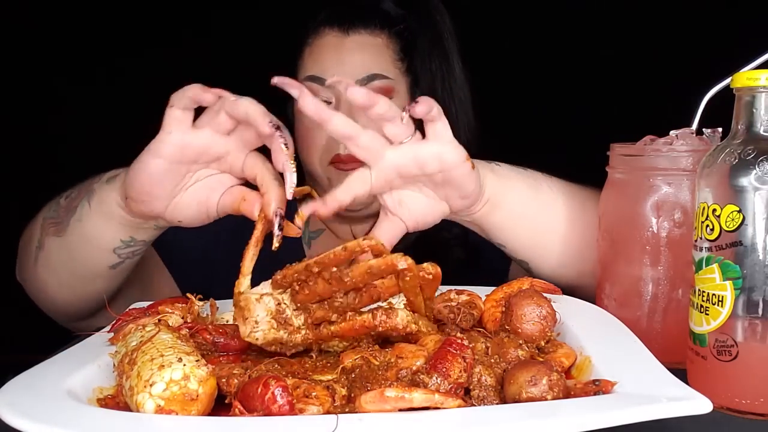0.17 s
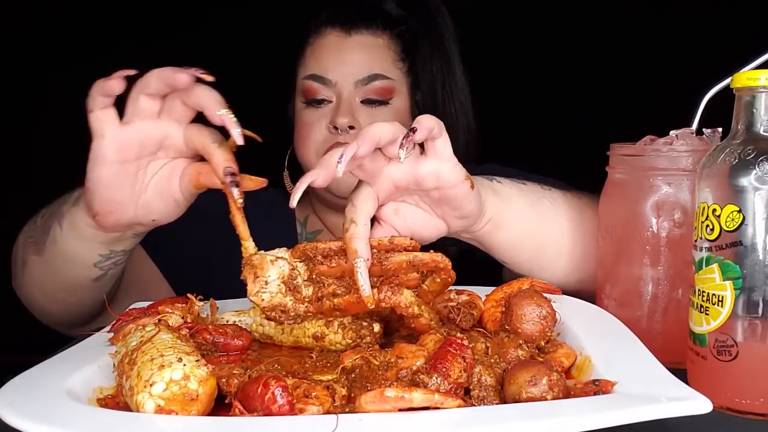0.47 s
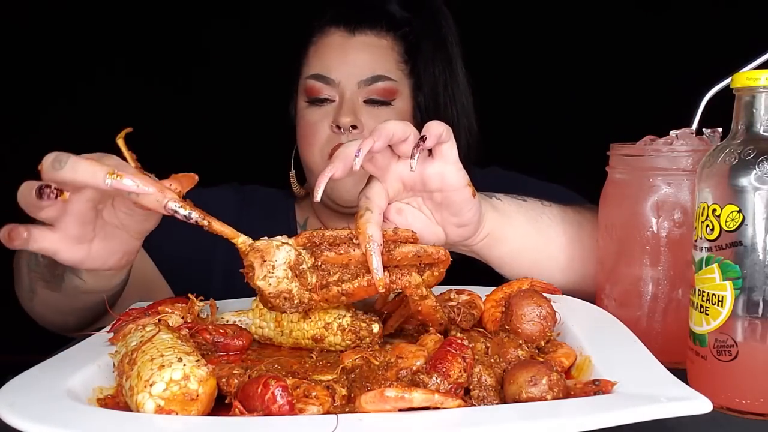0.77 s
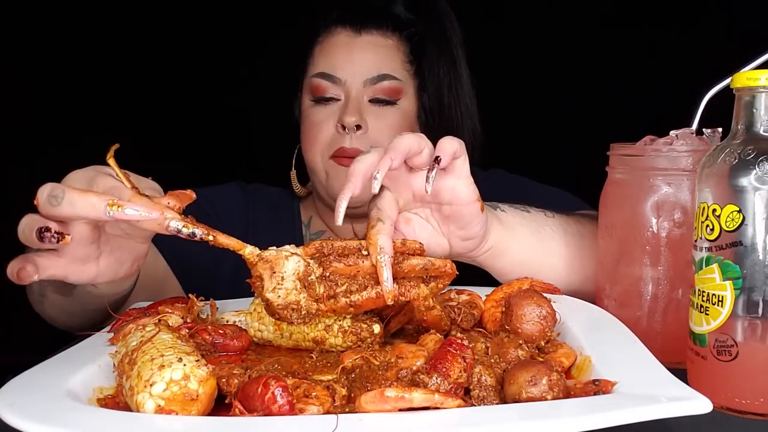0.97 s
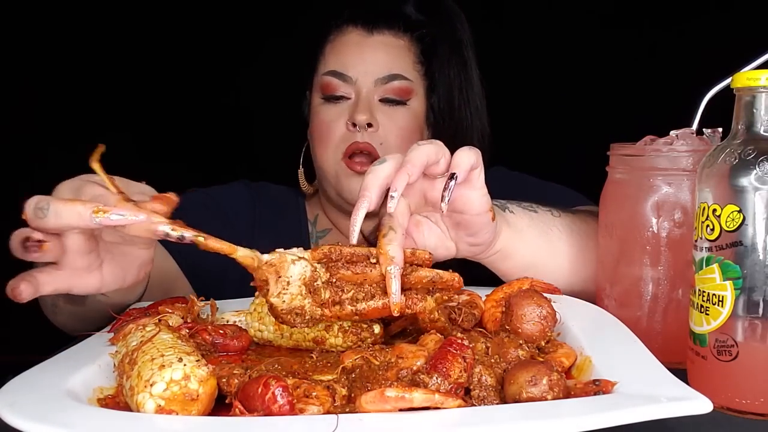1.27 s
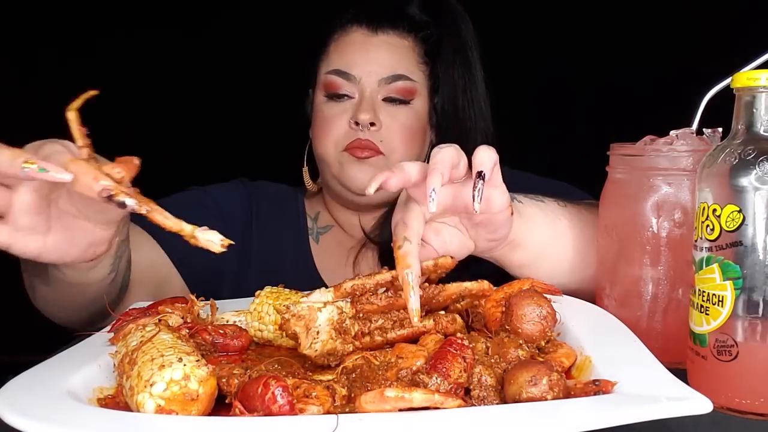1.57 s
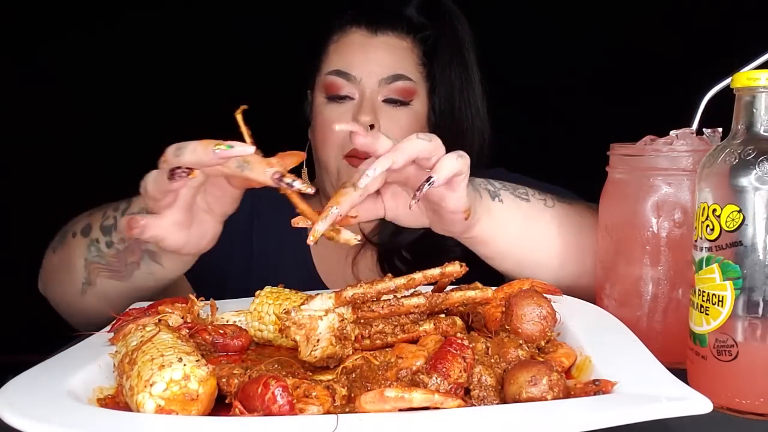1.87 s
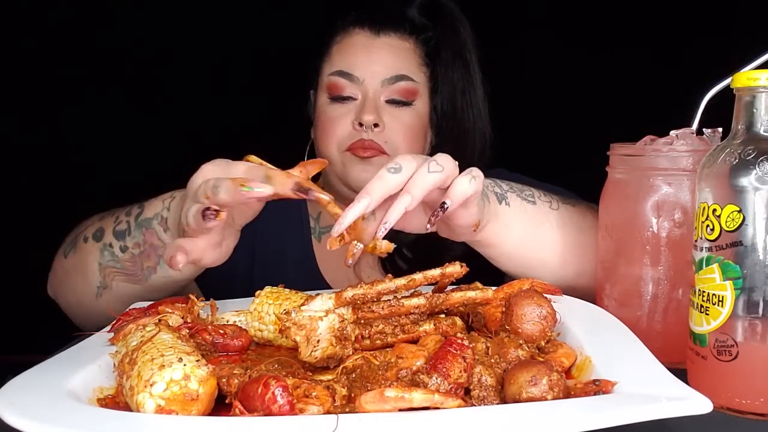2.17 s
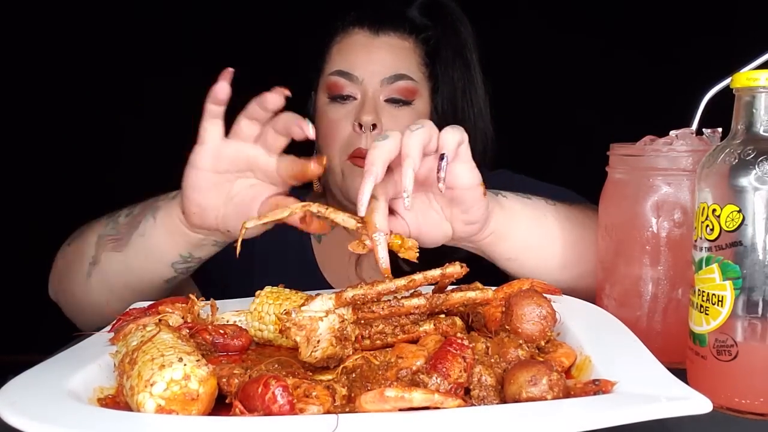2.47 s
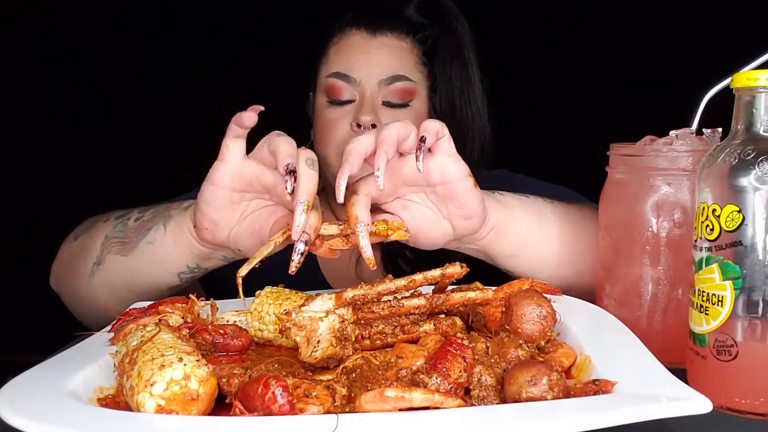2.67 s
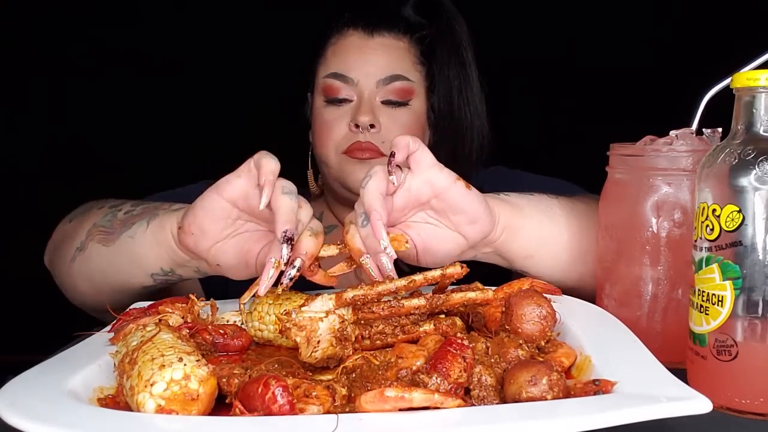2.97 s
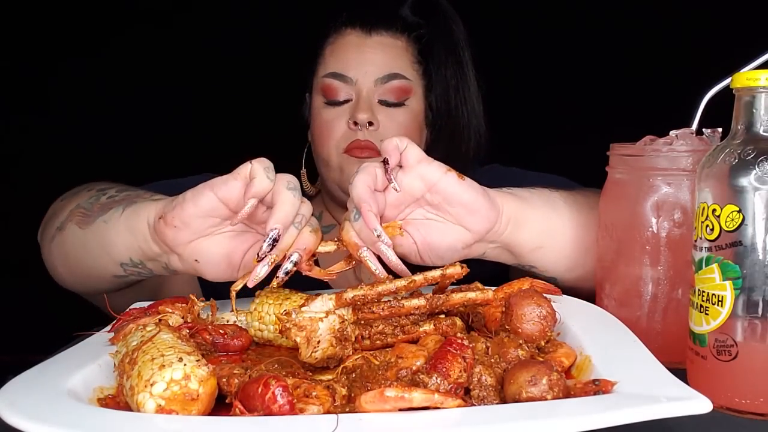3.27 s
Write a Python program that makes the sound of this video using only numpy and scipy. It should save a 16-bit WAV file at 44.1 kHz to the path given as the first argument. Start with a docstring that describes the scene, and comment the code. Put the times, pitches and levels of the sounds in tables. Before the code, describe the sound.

Sharp crab shell cracking with small ticks and squishes, close in a small humming room

```python
"""Fracture of a crab leg

A cooked crab leg is twisted off its cluster by hand, close to the right microphone in a small room.
Shell ticks and snaps are filtered noise bursts with short damped modes; hollow pieces knock as one mode.
Tearing fibres and squishing sauce are runs of tiny damped sinusoids. Decaying noise tails form the room.
An electric appliance hums as unsteady tones, with a rush of air and microphone hiss as coloured noise."""
import sys
import numpy as np
from scipy import signal
from scipy.fft import rfft, irfft, next_fast_len
from scipy.io import wavfile
from scipy.ndimage import uniform_filter1d, map_coordinates

SR = 44100
rng = np.random.default_rng(int(sys.argv[2]) if len(sys.argv) > 2 else 0)


def bounce(signal):
    """Save signal as a 16-bit WAV file at the path given by the first command-line argument."""
    frames = np.transpose(np.atleast_2d(signal))
    limited = np.clip(frames, -1, 1)
    pcm = np.round(limited * 32767).astype(np.int16)
    wavfile.write(sys.argv[1], SR, pcm)


N = 149940
TOP_HZ = 16000  # centre of the upper band edge
T = np.arange(SR // 25) / SR  # time within one small event, s

# Microphone hiss, relative spectrum: [f/Hz, level/dB]
HISS_SPECTRUM = [(1000, -1), (7000, -21), (9000, -11.5), (12000, -5), (15000, -3)]
# Additional hiss band of the right microphone, relative spectrum: [f/Hz, level/dB]
RIGHT_HISS_SPECTRUM = [(500, 11.5), (3500, -3), (5000, 0.5), (6200, -3), (7300, 5), (7800, -5), (8200, -54),
                       (10000, -45)]
HISS_DB, RIGHT_HISS_DB = -72, -61.5  # rms

# Rush of air from the appliance, relative spectrum: [f/Hz, level/dB]
AIR_SPECTRUM = [(20, -46), (45, -1), (80, -5.5), (140, -8), (180, -3), (215, 0.5), (250, -1), (280, -4.5),
                (380, -5), (460, -13), (520, -10.5), (640, -13.5), (760, -7.5), (860, -14), (1200, -23),
                (1800, -24.5), (2400, -29.5), (3500, -37), (7000, -50), (16000, -54)]
# Rms of the rush before its swell: [left level/dB, right level/dB]
AIR_DB = [-51.5, -48]
# Swell of the rush: [t/s, level/dB]
AIR_SWELL = [(0, 3.5), (.4, 2), (1.2, 0.8), (1.8, 0), (3.4, 0.2)]
# Left-right correlation of the rush: [f/Hz, correlation/1]
AIR_CORRELATION = [(60, 1), (150, 0.99), (300, 0.97), (600, 0.22), (1200, 0.04), (4000, 0.051)]
# Motor tones, rms before unsteadiness:
# [f/Hz, left level/dB, right level/dB, left phase lead/rad, unsteadiness/1]
HUM_TONES = [(58.75, -45.5, -46.5, -0.45, 0.1), (106.7, -42, -41, -0.091, 0.06),
             (174.9, -57, -56, 0.37, 0.13), (214.3, -64, -65.5, 0.52, 1), (291.1, -57, -53.5, 0.94, 0.23),
             (588.4, -59, -57, 0.73, 0.02), (794, -83.5, -65, 0.97, 0.1), (1646, -84, -72, -0.14, 0.27),
             (3004, -87, -84, 0.97, 0.2)]

# Late reverberation: [f/Hz, t60/s]
ROOM_T60 = [(300, 0.12), (2000, 0.18), (6000, 0.16), (15000, 0.12)]
# Room response at the left microphone: [f/Hz, level/dB]
ROOM_LEFT = [(1000, -6.5), (4000, -12), (7000, -20), (9000, -8), (15000, -13)]
# Room response at the right microphone: [f/Hz, level/dB]
ROOM_RIGHT = [(1000, -9), (3000, -8), (7000, -8), (9000, -9.5), (15000, -3)]
ROOM_GAP_S, EARLY_DB, EARLY_T60_S = 0.004, -9, 0.16  # early level is relative to the late tail

# Shading of the crab at the left microphone: [f/Hz, level/dB]
LEFT_SHADING = [(1000, -17.5), (2500, -20), (4000, -12), (5500, -22), (7300, -18), (9000, -12),
                (12000, -14.5), (15000, -23)]
LEFT_LAG_S, SCATTER_DB, SCATTER_T60_S = 0.00016, 6, .013

# Sauce squishes, rms over each run: [start t/s, length/s, level/dB, central f/Hz]
SQUISHES = [(.845, 0.035, -53, 2480), (1.288, .045, -50, 2470), (1.625, 0.053, -60, 2620),
            (2.15, 0.016, -63, 2500), (2.375, 0.045, -63.5, 2020)]
# Fibres tear and wet meat shifts, rms over each run: [start t/s, length/s, level/dB, central f/Hz]
TEARS = [(0, 0.029, -61, 6400), (.06, 0.046, -60.5, 7300), (.145, 0.051, -59, 8100),
         (.68, 0.076, -65, 10000), (.843, 0.039, -48.5, 6600), (.95, 0.27, -67.5, 9150),
         (1.292, 0.048, -42.5, 7000), (1.46, 0.11, -69.5, 10200), (1.755, 0.04, -54, 9900),
         (1.8, 0.044, -60, 9900), (2.15, 0.11, -84, 11700), (2.365, 0.059, -59.5, 9200),
         (2.7, .08, -76, 11900), (2.92, 0.53, -75, 12500), (3.255, 0.014, -62, 13000)]
# Hollow pieces of leg knock together: [t/s, level/dB, f/Hz, t60/s]
KNOCKS = [(0.1548, -44.5, 5710, .035), (0.851, -46, 2940, .015), (0.8673, -38, 2180, .012),
          (1.641, -53, 3300, .025), (1.758, -36.5, 3950, 0.031), (1.783, -36, 2230, .011),
          (1.814, -35.5, 1890, 0.014), (2.369, -53.5, 4550, 0.053)]
KNOCK_RISE_S, KNOCK_ROOM_DB = 0.00032, 3.5  # knocks reach the room more than the snaps do
KNOCK_ROUGH = .07  # random phase step, rad per sample

# Spectral envelope of a crack, before tilt: [f/Hz, level/dB]
SHELL_SPECTRUM = [(200, -31), (700, -27), (1300, -10), (1900, -9.5), (2700, 0.5), (4000, -0.5), (5500, 3.5),
                  (7500, 3.5), (9000, -4.5), (12000, 3.5), (15000, 2.5)]
CRACK_RISE_S = 0.00006
CRACK_RAGGED_DB, SPLINTER_RATE = 4, 3500  # spread in splinter strength; splinters per second
SECOND_MODE_DB = -3.5  # relative to the main mode
RING_RISE_S, RING_ROUGH = .0003, .09  # the wet piece drifts by a random phase step, rad per sample

# Small ticks of shell and fingernails: [t/s, crack level/dB, mode f/Hz]
TICKS = [(0.065, -40, 6300), (0.147, -33.5, 12700), (0.391, -26, 11100), (0.414, -32, 6900),
         (0.4775, -37, 5500), (0.6891, -34.5, 12500), (0.718, -37, 7240), (0.7784, -31, 13700),
         (.808, -38, 14000), (0.832, -27, 13000), (.847, -31, 13500), (0.9237, -30.5, 12600),
         (1.0535, -40, 6840), (1.176, -32, 13500), (1.227, -36, 13900), (1.4312, -36, 12600),
         (1.7507, -34, 8000), (1.782, -35, 10700), (2.1535, -55, 3300), (2.369, -39, 6400),
         (2.389, -41, 12100), (3.194, -45, 13900), (3.3185, -38.5, 14200)]
TICK_T60_S, TICK_TILT_DB = 0.0022, 1  # tilt per octave
TICK_RING_DB, TICK_RING_T60_S = -2.5, .0014  # ring setting relative to the crack's
# The shell gives way: [t/s, crack level/dB, tilt/(dB per octave), crack t60/s,
# main mode f/Hz, second mode f/Hz, main mode level/dB re amplitude 2]
SNAPS = [(0.3778, -28.5, -2, 0.01, 7160, 4940, -23.5), (0.6198, -30, -1, 0.01, 7120, 7500, -27.5),
         (0.8187, -33, 3, 0.0085, 13300, 7500, -45), (0.839, -32, -2, 0.004, 7100, 5160, -31),
         (0.8423, -29, -3, 0.0033, 9800, 7000, -26), (0.8497, -28.5, -1, 0.013, 7500, 6740, -22),
         (.8602, -35, -3, 0.005, 7000, 10800, -25.5), (.8675, -32, -4, 0.0045, 14800, 3000, -35),
         (1.2508, -23, 9, 0.0089, 6660, 3200, -34.5), (1.2526, -16, 14, 0.009, 12960, 11250, -11),
         (1.262, -33, 5, 0.006, 11500, 6900, -29), (1.272, -40, -7, 0.0081, 13500, 6800, -35),
         (1.287, -25, -4, .004, 13400, 15000, -26.5), (1.2895, -8, 3, 0.0051, 6070, 4830, -17),
         (1.2904, -14, 0, 0.0043, 6360, 2970, -21), (1.293, -18, -0.5, 0.012, 5340, 2500, -24),
         (1.2985, -4, 10, .0035, 14500, 12800, -19), (1.3038, -17, -4, 0.0035, 5760, 2850, -17),
         (1.3094, -8.5, 4.5, 0.0058, 14200, 2800, -19), (1.3179, -16.5, 0, 0.016, 5010, 5100, -16.5),
         (1.3202, -12.5, 0.5, 0.005, 12000, 3240, -29), (1.3263, -31, 3, .004, 7000, 3040, -24),
         (1.333, -25.5, -4, 0.006, 6500, 2730, -29), (1.336, -22, 3, 0.0047, 5070, 3500, -28),
         (1.3796, -15, -8.5, 0.0024, 2190, 1280, -25.5), (1.758, -37, 5, 0.0098, 4330, 7000, -30.5),
         (2.702, -43.5, -1, 0.0054, 8450, 7360, -52), (3.2533, -33.5, 8, 0.0085, 6800, 14400, -40)]
SNAP_RING_T60_S = .004


def amp(db):
    """A level in decibels corresponds to an amplitude ratio of 10^(dB/20)."""
    return 10 ** (np.asarray(db) / 20)


def unit(x):
    """Division by the root mean square gives a signal of rms 1."""
    return x / np.sqrt(np.mean(x ** 2) + 1e-20)


def along(points, hz):
    """A curve of (f/Hz, value) points is interpolated on a logarithmic frequency axis."""
    f, value = np.transpose(points)
    return np.interp(np.log(hz + 1), np.log(f + 1), value)


def add(track, s, sound):
    """Superposition: a sound starting at time s sums into the track in place."""
    start = max(round(s * SR), 0)
    part = track[..., start:][..., :sound.shape[-1]]
    part += sound[..., :part.shape[-1]]


def wobble(rate):
    """Random knots, rate per second, joined by a spline give a slow smooth fluctuation."""
    knots = rng.standard_normal(int(N * rate / SR) + 4)
    return map_coordinates(knots, [np.arange(N) * rate / SR])


def filtered(x, response):
    """A linear filter multiplies the spectrum by a response of frequency."""
    m = next_fast_len(N + SR // 2)
    hz = np.fft.rfftfreq(m, 1 / SR)
    return irfft(rfft(x, m) * response(hz), m)[..., :N]


def noise(spectrum):
    """White noise shaped by a spectrum becomes coloured noise of rms 1."""
    white = rng.standard_normal(N)
    return unit(filtered(white, lambda hz: amp(along(spectrum, hz))))


def hiss():
    """Microphone self-noise is independent per channel; the right has a louder band of its own."""
    left, right = amp(HISS_DB) * np.array([noise(HISS_SPECTRUM), noise(HISS_SPECTRUM)])
    return np.array([left, right + amp(RIGHT_HISS_DB) * noise(RIGHT_HISS_SPECTRUM)])


def air_rush():
    """Partial coherence: two independent noises in sum and difference set the left-right correlation."""
    def angle(hz):
        return np.arccos(np.clip(along(AIR_CORRELATION, hz), -1, 1)) / 2

    def shares(hz):
        return np.array([np.cos(angle(hz)), np.sin(angle(hz))])

    mid, side = filtered(np.array([noise(AIR_SPECTRUM), noise(AIR_SPECTRUM)]), shares)
    swell = amp(np.interp(np.arange(N) / SR, *np.transpose(AIR_SWELL)))
    return swell * amp(AIR_DB)[:, None] * np.array([mid + side, mid - side])


def motor_hum():
    """Tones as rotating phasors, with slow random changes of amplitude and phase, differ between ears."""
    t, hum = np.arange(N) / SR, np.zeros((2, N))
    for hz, left_db, right_db, lead, unsteady in HUM_TONES:
        carrier = np.exp(2j * np.pi * (hz * t + rng.random()))
        tone = carrier * (1 + unsteady * (wobble(7.04) + 1j * wobble(5.75)))
        left = amp(left_db) * tone * np.exp(1j * lead)
        right = amp(right_db) * tone
        hum += np.sqrt(2) * np.real([left, right])  # peak from rms
    return hum


def room(x):
    """Diffuse reverberation: after a short gap, each 40 ms of sound is convolved with a new noise tail."""
    wet, step = np.zeros((2, N)), SR // 25
    for i in range(0, N, step):
        hz, t, grid = signal.stft(rng.standard_normal((2, SR // 2)), SR, nperseg=256)
        late = amp(-60 * t / along(ROOM_T60, hz)[:, None])
        early = amp(EARLY_DB - 60 * t / EARLY_T60_S)
        tail = signal.istft(grid * (late + early), SR, nperseg=256)[1]
        tail /= np.linalg.norm(tail[0])
        add(wet, i / SR + ROOM_GAP_S, signal.fftconvolve(x[None, i:i + step], tail, axes=1))
    return filtered(wet, lambda hz: amp([along(ROOM_LEFT, hz), along(ROOM_RIGHT, hz)]))


def far_side(near):
    """Propagation to the left microphone delays and shades the crab; hands and plate scatter it."""
    blur, step = np.zeros(N), SR // 50
    for i in range(0, N, step):
        echo = rng.standard_normal(len(T)) * amp(-60 * T / SCATTER_T60_S)
        echo /= np.linalg.norm(echo)
        add(blur, i / SR, signal.fftconvolve(near[i:i + step], echo))

    def path(hz):
        return amp(along(LEFT_SHADING, hz)) * np.exp(-2j * np.pi * hz * LEFT_LAG_S)

    return filtered(near + amp(SCATTER_DB) * blur, path)


def grains(runs, count, spread, cycles, size_db, glide):
    """Many damped sinusoids, densest mid-run and scattered in pitch and size, fuse into a texture."""
    track = np.zeros(N)
    for s, length, db, hz in runs:
        place, size, pitch = rng.random((3, count))
        pitch = hz * np.exp(spread * (2 * pitch - 1))
        life = T * pitch[:, None] / cycles  # reaches 1 when a pop has decayed by 60 dB
        phase = 2 * np.pi * pitch[:, None] * T * (1 + glide * np.minimum(life, 1))
        pops = np.sin(phase) * amp(-60 * life)
        strength = amp(-size_db * np.log(np.maximum(size, .02)))  # few large, many small
        pops *= (strength * (pitch < TOP_HZ))[:, None]
        starts = (np.arccos(1 - 2 * place) / np.pi * length * SR).astype(int)
        samples = starts[:, None] + np.arange(len(T))
        run = np.bincount(samples.ravel(), pops.ravel())
        run *= np.sqrt(length * SR / (np.sum(run ** 2) + 1e-20))
        add(track, s, amp(db) * run)
    return track


def squishes():
    """Bubble resonance: each small bubble in the sauce is a damped tone of rising pitch."""
    return grains(SQUISHES, count=14, spread=.22, cycles=20, size_db=2.5, glide=.08)


def tears():
    """Crackling: tearing fibres and shifting meat emit dense, strongly damped pops of wide pitch range."""
    return grains(TEARS, count=150, spread=.85, cycles=6, size_db=4.5, glide=0)


def knocks():
    """A struck hollow piece rings in one damped mode, its phase drifting as a random walk."""
    track, t = np.zeros(N), np.arange(SR // 10) / SR
    for s, db, hz, t60 in KNOCKS:
        drift = KNOCK_ROUGH * np.cumsum(rng.standard_normal(len(t)))
        envelope = amp(db - 60 * t / t60) * (1 - np.exp(-t / KNOCK_RISE_S))
        add(track, s, envelope * np.sin(2 * np.pi * hz * t + drift))
    return track


def fracture(db, tilt_db, t60, main_hz, second_hz, ring_db, ring_t60):
    """Brittle fracture: splinters give a ragged noise burst, and the freed piece rings in two modes."""
    n = len(T)
    hz = np.fft.rfftfreq(n, 1 / SR)
    fade = amp(-60 * T / t60) * (1 - np.exp(-T / CRACK_RISE_S))
    strengths = amp(CRACK_RAGGED_DB * rng.standard_normal(n))
    splinters = strengths[(T * SPLINTER_RATE).astype(int)]
    burst = rfft(rng.standard_normal(n) * splinters * fade)

    # Replace the burst's smoothed spectrum by the shell's, through a minimum-phase filter
    smoothed = np.sqrt(np.abs(uniform_filter1d(np.abs(burst) ** 2, size=50)) + 1e-12)
    colour = amp(along(SHELL_SPECTRUM, hz) + tilt_db * np.log2(hz + 500))
    cepstrum = irfft(np.log(colour / smoothed), n)
    causal = 2 * cepstrum * (np.arange(n) < n // 2)
    crack = irfft(burst * np.exp(rfft(causal)), n)
    crack *= np.linalg.norm(fade) / np.linalg.norm(crack)

    drift = RING_ROUGH * np.cumsum(rng.standard_normal((2, n)), axis=1)
    main = np.sin(2 * np.pi * main_hz * T + drift[0])
    second = np.sin(2 * np.pi * second_hz * T + drift[1])
    modes = main + amp(SECOND_MODE_DB) * second
    ring = 2 * modes * amp(-60 * T / ring_t60) * (1 - np.exp(-T / RING_RISE_S))
    return amp(db) * crack + amp(ring_db) * ring


def ticks():
    """Small contacts of shell and fingernails are brief fractures, both modes at one frequency."""
    track = np.zeros(N)
    for s, db, hz in TICKS:
        tick = fracture(db, TICK_TILT_DB, TICK_T60_S, hz, hz, db + TICK_RING_DB, TICK_RING_T60_S)
        add(track, s, tick)
    return track


def snaps():
    """Release of strain: each failure of the shell is a fracture with its own colour and modes."""
    track = np.zeros(N)
    for s, *snap in SNAPS:
        add(track, s, fracture(*snap, SNAP_RING_T60_S))
    return track


def scene():
    """Superposition of the crab near the right microphone, its room and the background."""
    cracking = snaps() + ticks() + tears() + squishes()
    knocking = knocks()
    near = cracking + knocking
    direct = np.array([far_side(near), near])
    reverberant = room(cracking + amp(KNOCK_ROOM_DB) * knocking)
    return direct + reverberant + motor_hum() + air_rush() + hiss()


def record(dry):
    """Band limitation: the response falls linearly to zero over 400 Hz centred on the upper edge."""
    return filtered(dry, lambda hz: np.clip((TOP_HZ - hz) / 400 + .5, 0, 1))


dry = scene()
out = record(dry)
bounce(out)
```